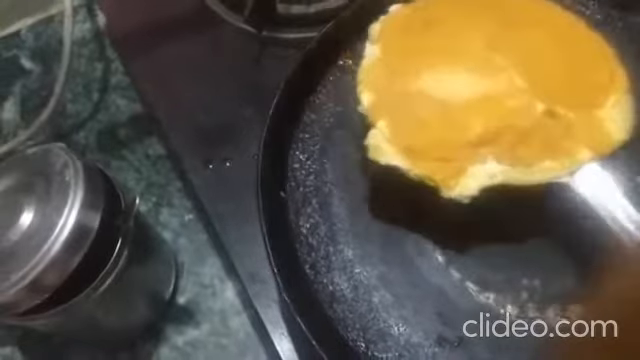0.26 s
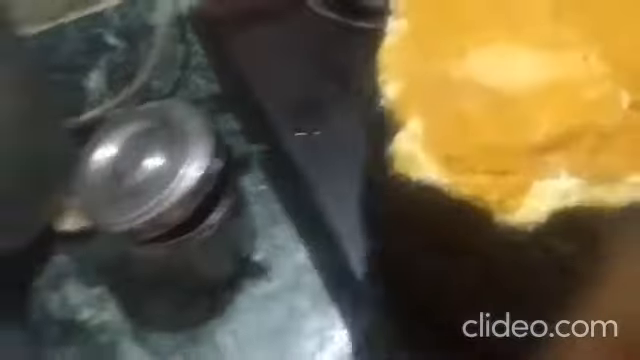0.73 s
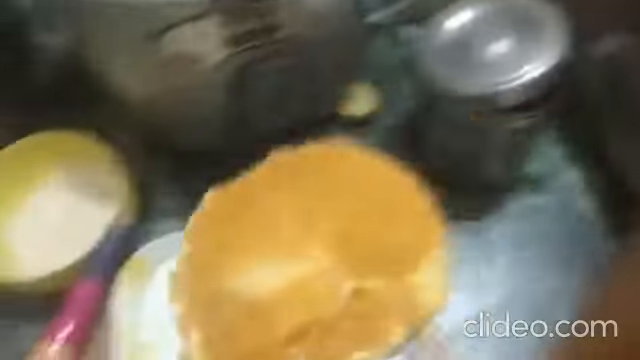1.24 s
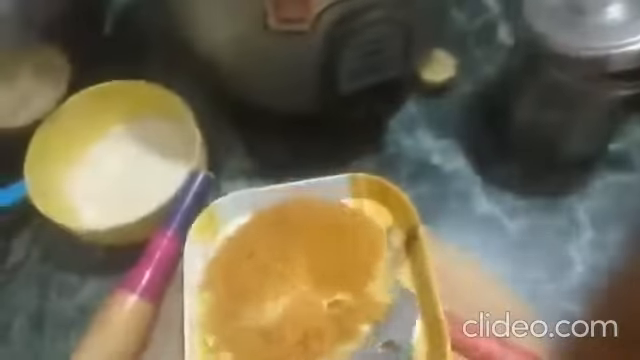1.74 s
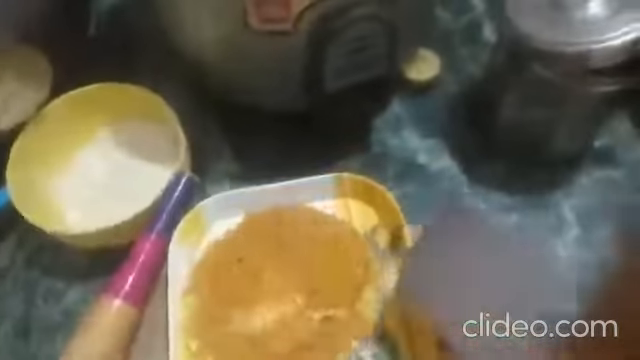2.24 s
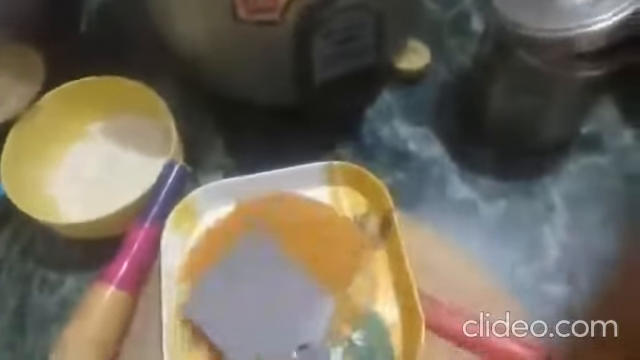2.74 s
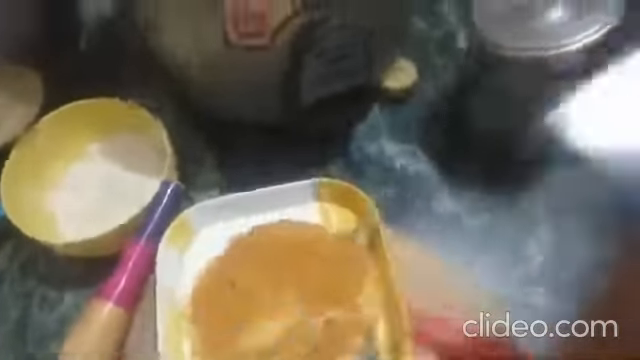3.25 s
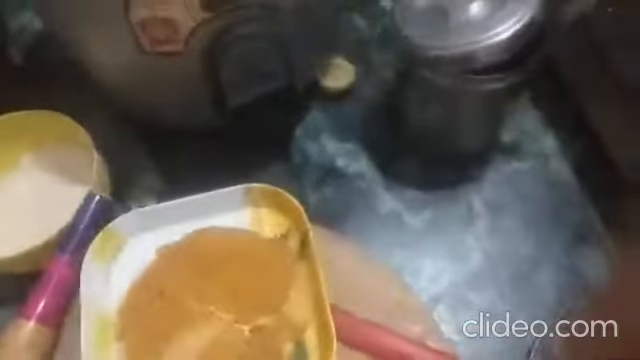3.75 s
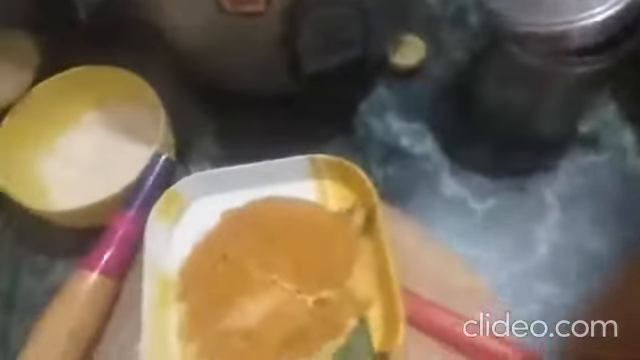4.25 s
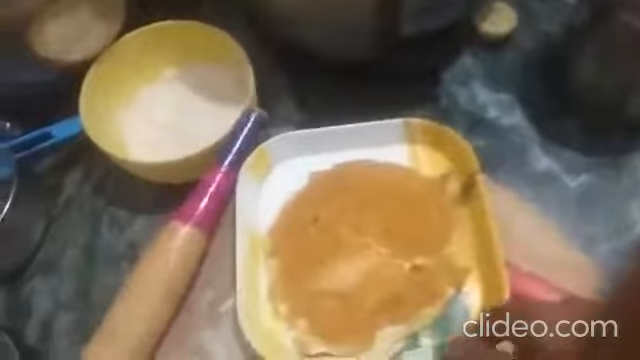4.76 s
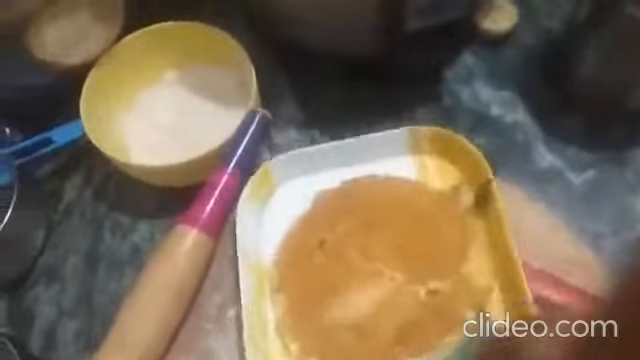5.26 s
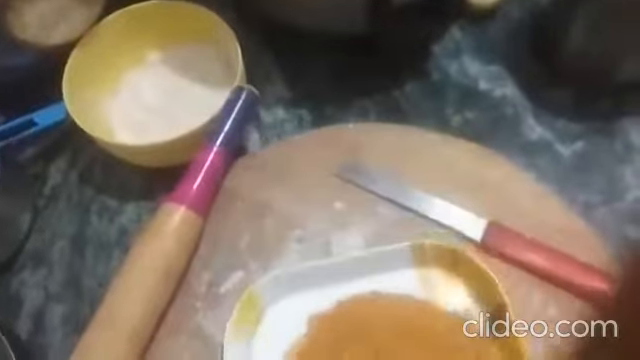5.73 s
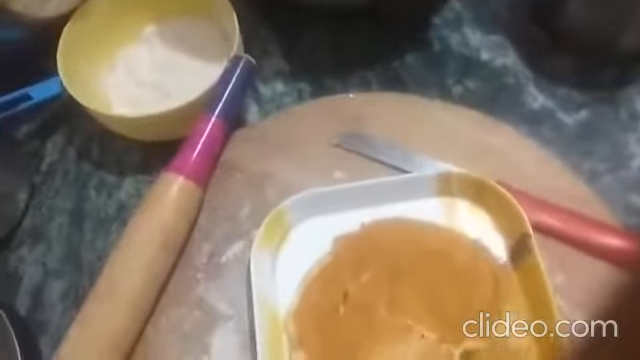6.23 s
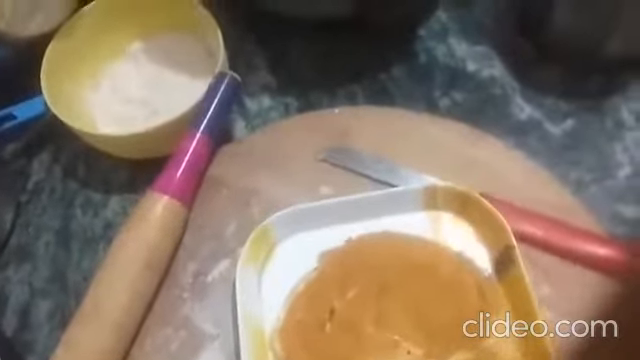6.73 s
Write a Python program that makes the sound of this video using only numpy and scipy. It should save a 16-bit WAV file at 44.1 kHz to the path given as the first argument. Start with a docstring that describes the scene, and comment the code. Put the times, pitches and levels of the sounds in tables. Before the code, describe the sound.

A faint sizzle of oil on a griddle opens the sound and fades by about 1.5 seconds. From the start, a hand and sleeve rub close against the microphone in uneven, scratchy strokes, with low rumble, small judders and dull bumps, growing stronger after 0.7 seconds. At about 1.6 seconds a metal spatula skids on a plate rim with a very short, harsh scrape. The rubbing continues, and at about 3.55 and 3.75 seconds the spatula is laid on the iron griddle with two clinks that ring briefly. The handling then quietens. Fingers tap softly on a plastic plate on a wooden board between 5 and 5.3 seconds, and the plate gives one sharp, hollow knock at 5.5. Rubbing, bumps and rumble return until the end at about 7 seconds. Quiet small-kitchen air and a faint, thin, high whine lie underneath throughout.

```python
"""A small kitchen, close to a hand-held camera: a metal spatula carries a flatbread from a griddle to a
plastic plate. Bubbles burst in the oil at first. Hand and sleeve rub and bump on the camera, and the
resonances of its case rumble. The blade scrapes the plate rim by stick-slip, then is laid on the griddle
with two clinks that set both metals ringing. The plate is tapped and knocked as it is picked up,
exciting short, damped modes. Quiet air and a thin whine lie underneath."""
import sys
import numpy as np
from scipy import signal
from scipy.fft import rfft, irfft
from scipy.io import wavfile
from scipy.ndimage import uniform_filter1d

SR = 44100
rng = np.random.default_rng(int(sys.argv[2]) if len(sys.argv) > 2 else 0)


def unload_wav(signal):
    """Save mono or channel-first audio to the path in sys.argv[1] as 16-bit WAV at rate SR, clipped to [-1, 1]."""
    wavfile.write(
        sys.argv[1],
        SR,
        np.round(np.clip(np.atleast_2d(signal).T, -1, 1) * 32767).astype(np.int16),
    )


N = 308252
TIME, FREQ = np.arange(N) / SR, np.fft.rfftfreq(N, 1 / SR)

# Levels in the tables are relative; a resonance's width is taken from its centre to half amplitude.
# Likeness of the sound at the two microphone ports: frequency_hz, correlation
PORT_CORRELATION = [(60, 0.88), (130, 0.93), (290, 0.88), (640, 0.37), (1410, -0.12), (3100, -0.084),
                    (6820, 0.89), (15000, 0.95)]
# Reverberation time of the kitchen: frequency_hz, t60_s
KITCHEN_DECAY = [(200, 0.68), (1500, 0.41), (5000, 0.26), (14000, 0.038)]
# How strongly a hiss flickers: frequency_hz, depth_factor
FLICKER_DEPTH = [(300, 0.58), (1500, 0.54), (5000, 1.4), (14000, 1.53)]
# Spectrum of the kitchen air: frequency_hz, density_db
AIR_SPECTRUM = [(15, -4), (25, 18.5), (38, -6.5), (113, -4), (152, -29), (188, -13), (221, -11.5),
                (495, -13), (614, -18), (762, -17), (4150, -38.5), (8130, -32.5), (15500, -35.5)]
# Narrow bands of the whine: pitch_hz, width_hz, level_db
WHINE_BANDS = [(7370, 33, 0), (7900, 55, -3), (8040, 86, 5), (8200, 90, -13)]
# Oil on the hot griddle, fading as the camera turns away: time_s, level_db
SIZZLE_LEVEL = [(0, -54), (0.35, -54), (0.7, -51.5), (1.0, -60), (1.4, -75), (2.0, -95)]
# Spectrum of the bursting bubbles: frequency_hz, density_db
SIZZLE_SPECTRUM = [(1000, -30), (2200, -11), (4500, -18), (6800, -13.5), (9000, -3.5), (11300, 0),
                   (13000, -4.5), (15000, -11)]
# Light drag of the hand between strokes: time_s, rasp_db
HAND_DRAG = [(0.0, -65), (0.7, -57), (1.3, -50.5), (2.3, -46.5), (2.55, -55), (3.05, -49.5), (3.5, -49),
             (3.58, -53), (3.72, -53.5), (3.85, -54.5), (4.1, -72), (5.4, -68), (5.6, -58), (6.99, -47)]
# Strokes of hand and sleeve:
# start_s, attack_s, hold_s, release_s, rasp_db, fizz_over_rasp_db, push_over_rasp_db
HAND_STROKES = [(0.0, 0.048, 0.15, 0.091, -57.5, 1, 2.5), (0.29, 0.31, 0.3, 0.05, -59.5, 0, -18),
                (0.63, 0.045, 0.05, 0.044, -54, 4, -19), (0.727, 0.032, 0.024, 0.054, -40.5, -12, -5.5),
                (0.903, 0.013, 0.02, 0.062, -45, 1.5, -7), (0.99, 0.096, 0.014, 0.036, -44, 0, -22),
                (1.12, 0.017, 0.014, 0.06, -43, -0.5, -9), (1.25, 0.021, 0.012, 0.078, -46.5, -9, -10),
                (1.379, 0.023, 0.057, 0.26, -41.5, -4.5, -2.5), (1.591, 0.065, 0.12, 0.023, -37, 2.5, -13),
                (1.835, 0.11, 0.0045, 0.048, -40, 7, -18), (2.016, 0.04, 0.027, 0.046, -39, 2, -3),
                (2.089, 0.086, 0.024, 0.034, -34.5, 2, -2.5), (2.27, 0.055, 0.1, 0.026, -51, -1, 4.5),
                (2.566, 0.089, 0.039, 0.09, -40.5, 0.5, -9.5), (2.739, 0.15, 0.046, 0.073, -40, 0, -4),
                (2.945, 0.016, 0.01, 0.039, -37.5, -9.5, 0.5),
                (3.261, 0.038, 0.042, 0.054, -34.5, 2.5, -7.5), (3.659, 0.018, 0.022, 0.04, -47.5, 8, -22),
                (4.762, 0.021, 0.015, 0.019, -57.5, -2, -2), (5.184, 0.018, 0.019, 0.022, -64.5, 9.5, -4),
                (5.446, 0.065, 0.015, 0.029, -62.5, 10, 8), (5.577, 0.054, 0.13, 0.021, -42, -0.5, -1.5),
                (5.707, 0.035, 0.038, 0.19, -37, -1.5, -6.5), (5.944, 0.074, 0.005, 0.045, -32.5, -2.5, -5),
                (6.065, 0.041, 0.02, 0.054, -39.5, -6.5, -2), (6.228, 0.064, 0.025, 0.03, -42, 8, -16),
                (6.27, 0.04, 0.05, 0.045, -36.5, 0.5, -0.5), (6.51, 0.044, 0.11, 0.038, -51.5, 6, -9),
                (6.652, 0.009, 0.013, 0.069, -43.5, -3, -3), (6.802, 0.12, 0.01, 0.04, -38, 3.5, -16)]
# Spectrum of skin and cloth friction: frequency_hz, density_db
RUB_SPECTRUM = [(120, -8), (200, 0), (262, -4), (324, 3.5), (425, -10.5), (481, -6.5), (767, -8), (824, -7),
                (1000, -7.5), (1600, -9.5), (2250, -8), (3000, -8.5), (5040, -11.5), (6240, -13),
                (9300, -7), (10800, -3.5), (12300, -5), (13500, -9.5), (14900, -14.5)]
# Fibres catch and snap free: start_s, level_db, length_s, centre_hz
FIBRE_SLIPS = [(0.906, -45.5, 0.07, 800), (0.916, -41.5, 0.03, 11000), (1.264, -44.5, 0.046, 810),
               (1.384, -36.5, 0.036, 10500), (4.791, -44.5, 0.0046, 10900), (5.725, -41, 0.037, 760),
               (5.82, -39.5, 0.047, 780), (6.793, -39.5, 0.063, 10400)]
# Low resonances of the camera case: pitch_hz, width_hz, level_db
CASE_RESONANCES = [(53, 81, -9), (111.4, 19.5, 9.5), (187, 18, -9.5), (254, 130, -9.5)]
# Firmness of the grip, heard as rumble: time_s, level_db
GRIP_LEVEL = [(0, -47.5), (0.45, -53), (0.75, -64), (1.1, -54), (1.45, -47.5), (1.95, -49), (2.3, -45.5),
              (2.6, -47.5), (2.95, -42), (3.2, -54), (3.45, -45), (3.6, -55), (4.2, -56), (4.4, -66),
              (5.15, -61), (5.5, -61), (5.75, -41), (6.0, -45.5), (6.99, -46.5)]
# The grip tightens and flexes the case: start_s, length_s, level_db
GRIP_PRESSES = [(0.03, 0.25, -46.5), (0.346, 0.56, -57.5), (0.95, 0.18, -51), (2.027, 0.051, -44.5),
                (2.717, 0.23, -45.5), (3.298, 0.066, -42), (5.742, 0.098, -45), (6.16, 0.28, -47),
                (6.66, 0.076, -40)]
# A fingertip judders as it creeps over the case: start_s, length_s, rate_hz, level_db
FINGER_JUDDERS = [(0.117, 0.069, 101, -44), (1.454, 0.081, 103.9, -42), (1.534, 0.077, 105.5, -38.5),
                  (1.696, 0.099, 106, -41), (2.427, 0.077, 103.5, -45), (2.768, 0.07, 95, -42),
                  (2.86, 0.16, 197.8, -44), (3.363, 0.16, 102.3, -41.5), (4.575, 0.23, 93, -45.5),
                  (4.867, 0.095, 93, -48.5), (6.34, 0.11, 110.3, -38)]
# The hand bumps the camera: start_s, level_db, decay_s
HAND_BUMPS = [(0.749, -43, 0.038), (0.906, -41.5, .04), (1.256, -42, 0.023), (1.417, -34.5, 0.027),
              (1.458, -42, .018), (2.156, -36, .035), (5.735, -38.5, 0.027), (6.325, -38, 0.044),
              (6.672, -39, .016)]
# Resonances of the bumped case: pitch_hz, width_hz, level_db
THUD_RESONANCES = [(140, 41, -1.5), (300, 37, -2.5), (540, 140, -8), (973, 120, -12)]
# The blade edge skids over the plate rim: start_s, level_db, length_s
RIM_SKIDS = [(1.616, -24, 0.0023), (1.618, -18.5, 0.0027), (1.619, -24.5, 0.005), (1.628, -30, .001)]
# Spectrum of steel skidding on the rim: frequency_hz, density_db
SKID_SPECTRUM = [(530, -58), (900, -26), (2250, -4.5), (4980, -16), (5610, -1), (7060, -9), (7860, -1),
                 (9200, -10), (11300, -1), (14000, -13), (16000, -21)]
# The spatula meets the griddle; lying flat, it damps the iron:
# start_s, attack_s, hold_s, clatter_db, clang_db, cutoff_hz, griddle_db, blade_db, griddle_t60_factor
SPATULA_CONTACTS = [(3.551, .002, .006, -29.5, -28, 15700, -4, -20, 1),
                    (3.561, .002, .004, -45, -43, 7000, 13, -14, 1),
                    (3.757, .002, .006, -41, -49, 7000, 2, -1, 0.5),
                    (3.764, .004, .018, -48.5, -46, 1050, -1, -2, 0.55),
                    (3.783, .005, .04, -55, -58, 3600, -20, 8, .4)]
# Coupled resonances of blade and iron while they touch: pitch_hz, width_hz, level_db
CLANG_RESONANCES = [(968, 38, 2), (2210, 68, 1.5), (4340, 130, -6), (5870, 90, -18), (6600, 100, -18),
                    (7840, 91, -2), (8260, 80, -8), (9960, 140, -4), (11200, 250, -7), (13600, 200, -10)]
# Modes of the iron griddle: pitch_hz, level_db
GRIDDLE_MODES = [(684, -60), (947.5, -46), (978, -54), (2005, -51), (2247, -51), (2611, -54.5), (2988, -58),
                 (3290, -61), (3470, -55.5), (3566, -60), (3725, -59), (4199, -48), (4398, -55),
                 (5227, -57), (5862, -53), (6433, -61), (6578, -56), (7830, -52), (8236, -61), (9539, -61),
                 (9835, -57), (10099, -52), (11273, -53), (11590, -58), (13340, -58)]
# Modes of the spatula blade: pitch_hz, level_db
BLADE_MODES = [(684, -50.5), (969, -47), (1518, -55), (1653, -51), (1986, -55), (2606, -56), (3020, -60),
               (3268, -58), (3570, -52.5), (4091, -55), (4538, -59), (5254, -62), (5841, -69), (7483, -68)]
# Fingers tap the plate on the board: start_s, level_db
FINGER_TAPS = [(4.999, -35.5), (5.007, -36.5), (5.115, -31), (5.123, -39), (5.256, -42.5)]
# Modes of the plate pressed on the wooden board: pitch_hz, level_db, t60_s
BOARD_MODES = [(190, -22, 0.06), (407, -8, 0.049), (646, 3, 0.01), (916, -5, 0.026), (1450, -10.5, 0.014),
               (2520, -17.5, 0.018), (3500, -18, 0.008)]
# Modes of the plastic plate: pitch_hz, level_db, t60_s
PLATE_MODES = [(475, -10, 0.0085), (950, -2.5, 0.0059), (1580, 0.1, 0.015), (2070, -14, 0.045),
               (2480, -7, 0.0078)]


def amp(db):
    """Amplitude grows tenfold for every 20 dB."""
    return 10 ** (np.asarray(db) / 20)


def unit(x):
    """Normalisation to rms 1."""
    return x / np.sqrt(np.mean(x ** 2) + 1e-20)


def at_hz(points, hz=FREQ):
    """Interpolation on a log-frequency axis."""
    frequencies, values = np.transpose(points)
    return np.interp(np.log(hz + 1), np.log(frequencies + 1), values)


def add(mix, start_s, sound):
    """Superposition: a sound joins the mix at start_s."""
    part = mix[:, round(start_s * SR):][:, :sound.shape[-1]]
    part += sound[..., :part.shape[1]]


def below(cutoff_hz, order=4):
    """Butterworth low-pass gain over FREQ."""
    return 1 / np.sqrt(1 + (FREQ / cutoff_hz) ** (2 * order))


def above(cutoff_hz, order=4):
    """The power-complementary high-pass gain."""
    return np.sqrt(1 - below(cutoff_hz, order) ** 2)


def peaks(resonances):
    """Resonance: each adds a Lorentzian peak to a gain over FREQ."""
    return sum(amp(db) / (1 + ((FREQ - hz) / width) ** 2) for hz, width, db in resonances)


def filtered(x, gain):
    """Linear filtering multiplies the spectrum by a gain."""
    return irfft(rfft(x) * gain, N)


def noise(gain, max_correlation=1.0):
    """Partial coherence: coloured noise at two ports, with rms 1 in their mean."""
    mid, side = rfft(rng.standard_normal((2, N))) * gain
    correlation = np.clip(at_hz(PORT_CORRELATION), -.5, max_correlation)
    side *= np.sqrt((1 - correlation) / (1 + correlation))
    return irfft([mid + side, mid - side], N) / irfft(mid, N).std()


def wobble(rate_hz):
    """Low-passed noise gives a smooth random fluctuation of rms 1."""
    return unit(filtered(rng.standard_normal(N), below(rate_hz, order=2)))


def pulses(per_s, decay_s):
    """Shot noise: independent pulses of random size, each decaying exponentially."""
    impulses = rng.random(N) * (rng.random(N) < per_s / SR)
    return signal.fftconvolve(impulses, np.exp(-TIME[:SR // 50] / decay_s))[:N]


def flicker(x, depth_db):
    """Random amplitude modulation in small patches of time and pitch, deepest in the treble."""
    hz, _, spectrum = signal.stft(x, SR, nperseg=1024)
    field = uniform_filter1d(rng.standard_normal(spectrum.shape[1:]), size=4, axis=0)
    field = unit(uniform_filter1d(field, size=5, axis=1))
    gain = amp(depth_db * at_hz(FLICKER_DEPTH, hz)[:, None] * np.minimum(field, 1.7))
    gain /= np.sqrt(np.mean(gain ** 2, axis=1, keepdims=True))
    return signal.istft(spectrum * gain, nperseg=1024)[1][:, :N]


def swell(start_s, attack_s, hold_s, release_s):
    """An excitation builds up, holds and decays exponentially."""
    rise = np.sin(np.pi / 2 * np.clip((TIME - start_s) / attack_s, 0, 1))
    return rise * np.exp(-np.maximum(TIME - start_s - attack_s - hold_s, 0) / release_s)


def ring(modes, detune, phase=0):
    """Free vibration after a blow: a sum of damped sinusoids, each randomly detuned."""
    t = TIME[:SR // 2]
    tuning = 1 + detune * (2 * rng.random(len(modes)) - 1)
    return sum((-1) ** k * amp(db - 60 * t / t60) * np.sin(2 * np.pi * hz * tuning[k] * t + phase)
               for k, (hz, db, t60) in enumerate(modes))


def room(x, echoes_per_s=3000):
    """Reverberation: dense reflections off tiles and stone, the treble dying first."""
    echoes = rng.standard_normal((2, SR)) * (rng.random((2, SR)) < echoes_per_s / SR)
    hz, t, spectrum = signal.stft(echoes * (TIME[:SR] > .004), SR, nperseg=256)
    decay = amp(-60 * t / at_hz(KITCHEN_DECAY, hz)[:, None])
    tail = signal.istft(spectrum * decay, SR, nperseg=256)[1]
    return signal.fftconvolve(x, tail / np.linalg.norm(tail[0]), axes=1)[:, :N]


def kitchen_air(air_db=-56.5, whine_db=-69):
    """Ambient noise: a broad band is heard as quiet air, narrow bands as a fuzzy whine."""
    whine = noise(peaks(WHINE_BANDS))
    air = noise(amp(at_hz(AIR_SPECTRUM)) * above(44, order=2))
    return flicker(amp(air_db) * air + amp(whine_db) * whine, depth_db=2)


def oil_sizzle(steady=.6):
    """Incoherent summation: thousands of tiny bubbles burst in the oil and merge into a hiss."""
    bursts = unit(steady + pulses(per_s=4000, decay_s=.0004))
    hiss = flicker(bursts * noise(amp(at_hz(SIZZLE_SPECTRUM))), depth_db=4)
    return amp(np.interp(TIME, *np.transpose(SIZZLE_LEVEL))) * hiss


def friction_envelopes():
    """Drag and strokes add in power, giving the amplitudes of rasp, fizz and dull push."""
    drag_db = np.interp(TIME, *np.transpose(HAND_DRAG))
    power = amp([drag_db, drag_db - 1.5, drag_db - 1.5]) ** 2
    for *timing, db, fizz_db, push_db in HAND_STROKES:
        power += (amp([[db], [db + fizz_db], [db + push_db]]) * swell(*timing)) ** 2
    return np.sqrt(power)


def hand_rubbing(rasp_db=-1, fizz_db=-2, slip_rise_s=.0015):
    """Stick-slip friction: skin and cloth catch and let go in tiny grains."""
    rasp, fizz, push = friction_envelopes()
    colour = amp(at_hz(RUB_SPECTRUM))
    out = amp(rasp_db) * rasp * noise(colour * above(420) * below(6660))
    out += amp(fizz_db) * fizz * noise(colour * above(4360))
    out += push * noise(colour * above(120) * below(885))
    for start, db, length, hz in FIBRE_SLIPS:
        age = np.maximum(TIME - start, 0)
        envelope = (1 - np.exp(-age / slip_rise_s)) * np.exp(-(age / length) ** 2)
        out += amp(db) * envelope * noise(colour * above(hz / 2) * below(hz * 1.46))
    snag_db = 7 * pulses(per_s=70, decay_s=.00028)  # snagged fibres let go with tiny ticks
    grain_db, flutter_db = .56 * wobble(520), 1.06 * wobble(27)
    return flicker(out * unit(amp(grain_db + flutter_db + snag_db)), depth_db=4.5)


def squeeze(start_s, length_s, rise_s=.017, fall_s=.13):
    """A trapezoidal envelope: the grip tightens and relaxes."""
    tighten = np.clip((TIME - start_s) / rise_s, 0, 1)
    return tighten * np.clip((start_s + length_s - TIME) / fall_s + .5, 0, 1)


def rumble(gain):
    """Random vibration, held at even strength by dividing by its running rms."""
    shaking = noise(gain, max_correlation=.93)
    return shaking / np.sqrt(uniform_filter1d((shaking ** 2).mean(0), size=5000))


def camera_case(grip_db=1, sway_db=-19, flex_hz=54.7, flex_width_hz=16, jitter=.019):
    """Forced vibration: the grip shakes and flexes the case, and a fingertip judders on it."""
    grip = amp(np.interp(TIME, *np.transpose(GRIP_LEVEL)) + grip_db)
    sway = amp(sway_db) * below(60, order=2) * above(36)
    out = grip * rumble(peaks(CASE_RESONANCES) + sway)
    flex = sum(amp(db) * squeeze(start, length) for start, length, db in GRIP_PRESSES)
    out += flex * rumble(peaks([(flex_hz, flex_width_hz, 0)]))
    uneven_time = np.cumsum(1 + jitter * wobble(34)) / SR
    for start, length, hz, db in FINGER_JUDDERS:
        out += amp(db) * squeeze(start, length) * np.sqrt(2) * np.sin(2 * np.pi * hz * uneven_time)
    return filtered(out, above(46, order=3))


def hand_bumps(rise_s=.0025):
    """Soft impacts excite only low resonances: the case gives a short, dull shudder."""
    envelope = sum(amp(db) * swell(start, rise_s, 0, decay) for start, db, decay in HAND_BUMPS)
    return envelope * rumble(peaks(THUD_RESONANCES) * above(100) * below(1300))


def blade_skid(room_db=-13):
    """Stick-slip of steel on the plate rim gives harsh bursts a few milliseconds long."""
    envelope = sum(amp(db) * np.exp(-(2 * (TIME - start) / length - 1) ** 4)
                   for start, db, length in RIM_SKIDS)
    out = envelope * noise(amp(at_hz(SKID_SPECTRUM)), max_correlation=.5)
    return out + amp(room_db) * room(out)


def struck_metal(lines, t60_at_1khz_s, crowd_db=-12, crowd_life=.65):
    """Plate modes: higher ones die slightly sooner; weaker, shorter ones crowd between the main ones."""
    modes = [(hz, db, t60_at_1khz_s * (1000 / hz) ** .01) for hz, db in lines]
    median_db = np.median([db for hz, db in lines])
    crowd = 2 * [(hz, (db + median_db) / 2 + crowd_db, t60 * crowd_life) for hz, db, t60 in modes]
    # a wide plate reaches the two ports out of step
    return np.array([ring(modes, detune=.001, phase=phase) + ring(crowd, detune=.21)
                     for phase in (0, np.pi / 2)])


def spatula_clinks(clatter_s=.006, clang_s=.017, ring_room_db=-14, contact_room_db=-17):
    """Forced, then free vibration: the spatula chatters and clangs on the iron, and both ring on."""
    contact, ringing = np.zeros((2, 2, N))
    for start, attack, hold, clatter_db, clang_db, cutoff, griddle_db, blade_db, life in SPATULA_CONTACTS:
        lowpass = below(cutoff, order=2)
        clatter = noise(above(cutoff / 9, order=2) * lowpass, max_correlation=.05)
        contact += amp(clatter_db) * swell(start, attack, hold, clatter_s) * clatter
        clang_colour = peaks(CLANG_RESONANCES) * above(cutoff / 12, order=2) * lowpass
        clang = noise(clang_colour, max_correlation=.57)
        contact += amp(clang_db) * swell(start, attack, hold, clang_s) * clang
        griddle = amp(griddle_db) * struck_metal(GRIDDLE_MODES, t60_at_1khz_s=.35 * life)
        blade = amp(blade_db) * struck_metal(BLADE_MODES, t60_at_1khz_s=.24)
        add(ringing, start + attack, griddle + blade)
    return contact + ringing + room(amp(ring_room_db) * ringing + amp(contact_room_db) * contact)


def finger_taps(room_db=-10):
    """Heavily damped modes sound as soft taps press the plate on the wooden board."""
    out = np.zeros((2, N))
    for start, db in FINGER_TAPS:
        add(out, start, amp(db) * ring(BOARD_MODES, detune=.16))
    return out + amp(room_db) * room(out)


def plate_knock(start_s=5.5024, bounce_s=.00126, low_hz=380, high_hz=2900, room_db=-16):
    """Impact and rebound: the plastic plate hits, bounces at once and rings with a hollow knock."""
    out = np.zeros((2, N))
    blow = amp(-7) * np.array([ring(PLATE_MODES, detune=.018) for port in range(2)])
    add(out, start_s, blow)
    add(out, start_s + bounce_s, amp(-2) * blow)
    # the loose plate rattles briefly as it settles
    out += amp(-37) * swell(start_s, .003, 0, .032) * noise(below(high_hz), max_correlation=.5)
    # a soft contact gives no treble, and a small plate radiates no bass
    out = signal.sosfilt(signal.butter(4, [low_hz, high_hz], "bandpass", fs=SR, output="sos"), out)
    # the hard rim adds a thin snap
    out += amp(-43) * swell(start_s, .001, .001, .0024) * noise(above(high_hz) * below(5200))
    return out + amp(room_db) * room(out)


def scene():
    """Superposition of all sources at the two ports, the hand slightly to the right."""
    hand = (hand_rubbing() + hand_bumps() + camera_case()) * amp([[-.4], [.4]])
    utensils = blade_skid() + spatula_clinks() + plate_knock() + finger_taps()
    return hand + utensils + kitchen_air() + oil_sizzle()


def record(dry):
    """Band limiting: a linear-phase low-pass removes the highest treble."""
    lowpass = signal.firwin(301, cutoff=15100, window=("kaiser", 9), fs=SR)
    return signal.oaconvolve(dry, lowpass[None], "same")


dry = scene()
out = record(dry)
unload_wav(out)
```